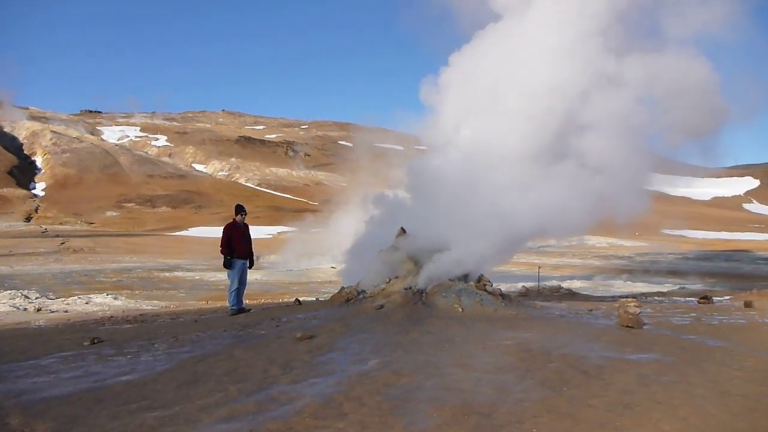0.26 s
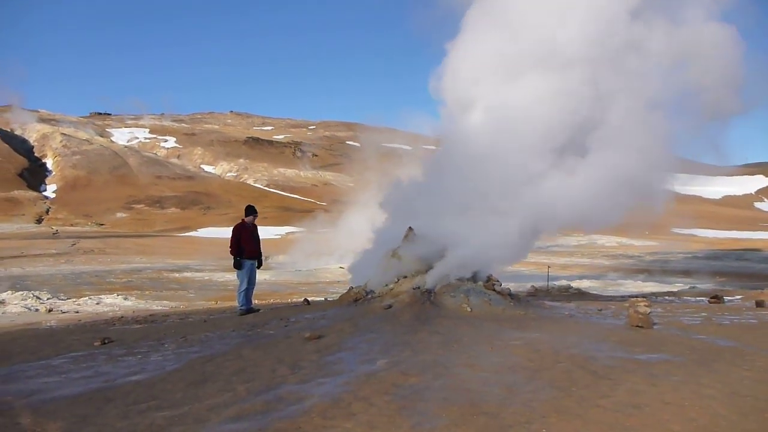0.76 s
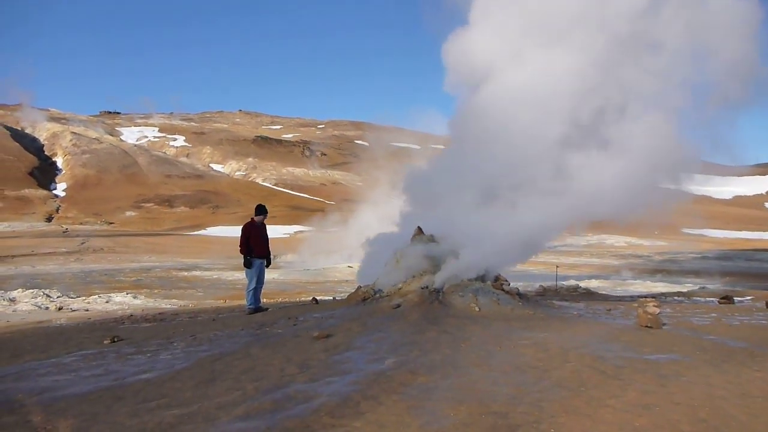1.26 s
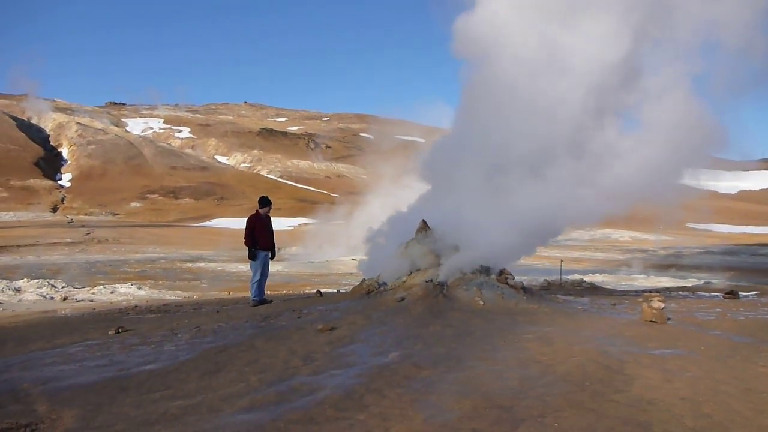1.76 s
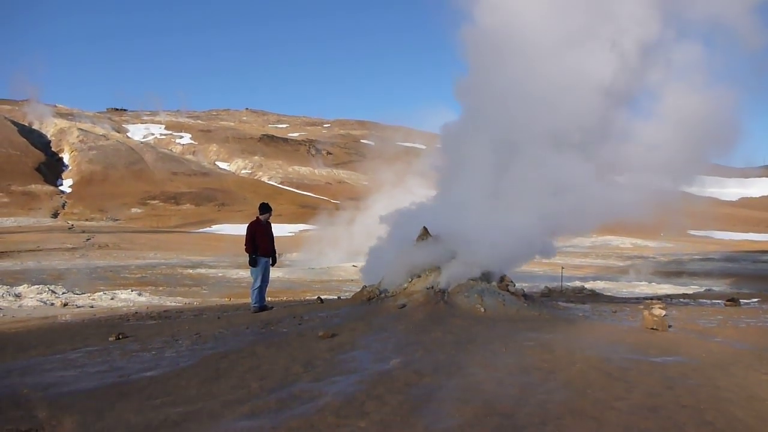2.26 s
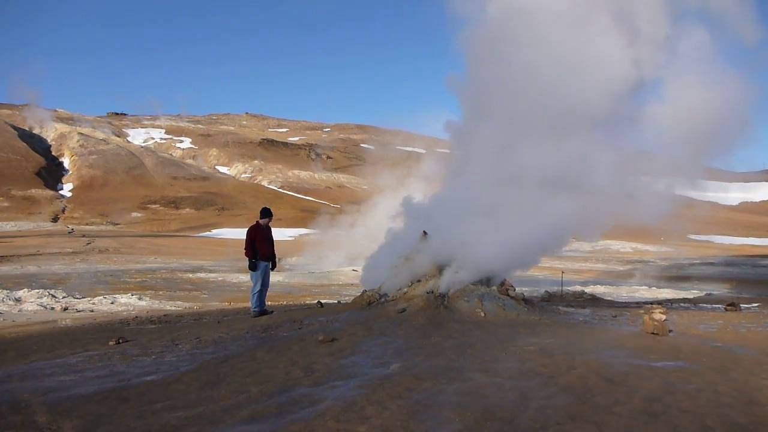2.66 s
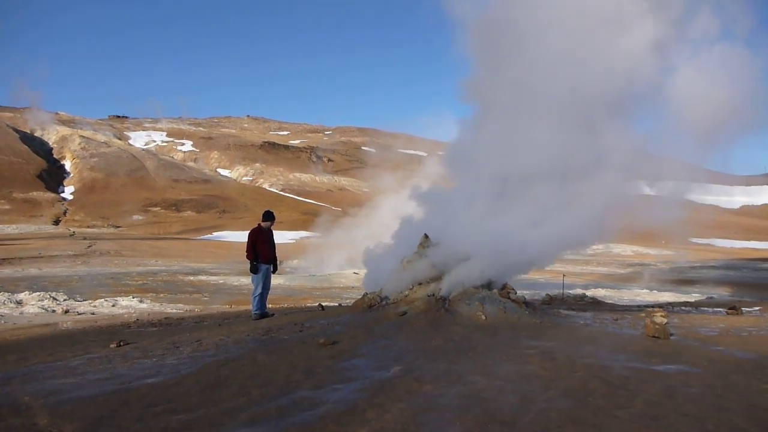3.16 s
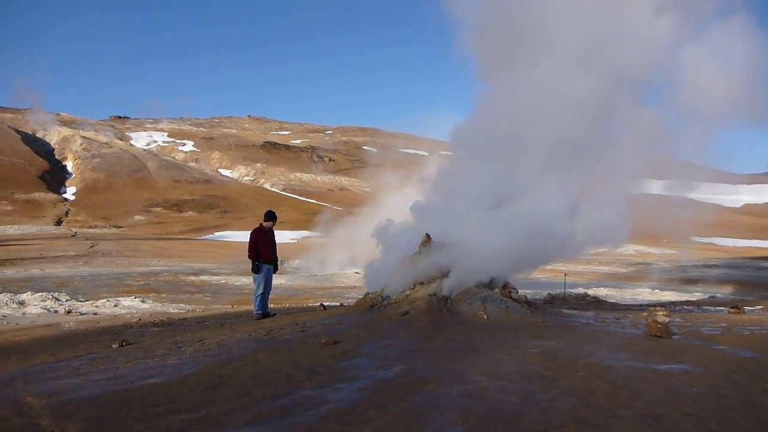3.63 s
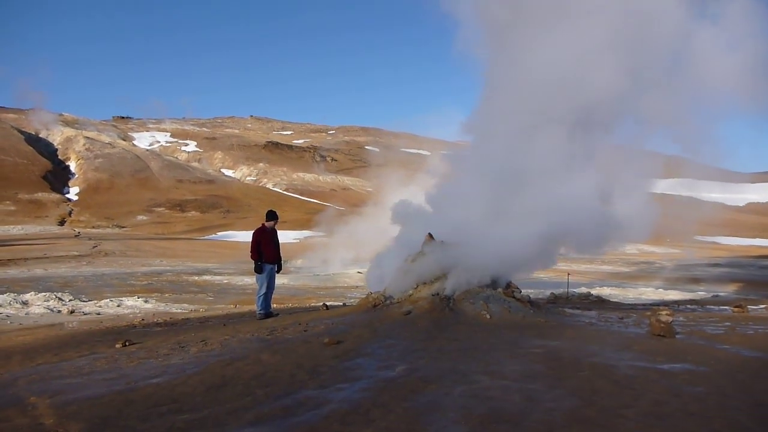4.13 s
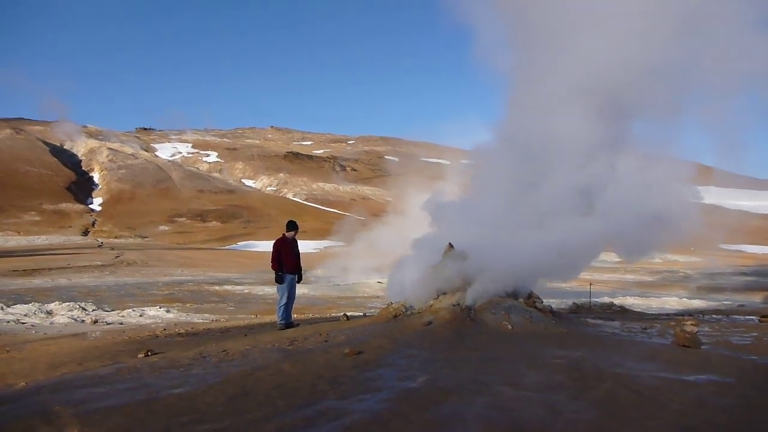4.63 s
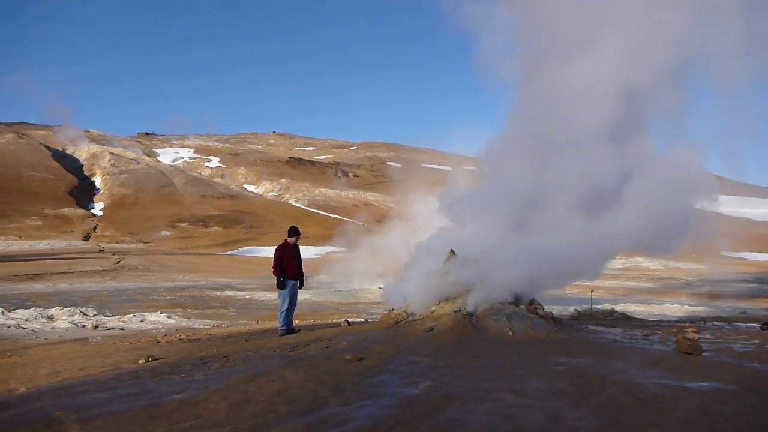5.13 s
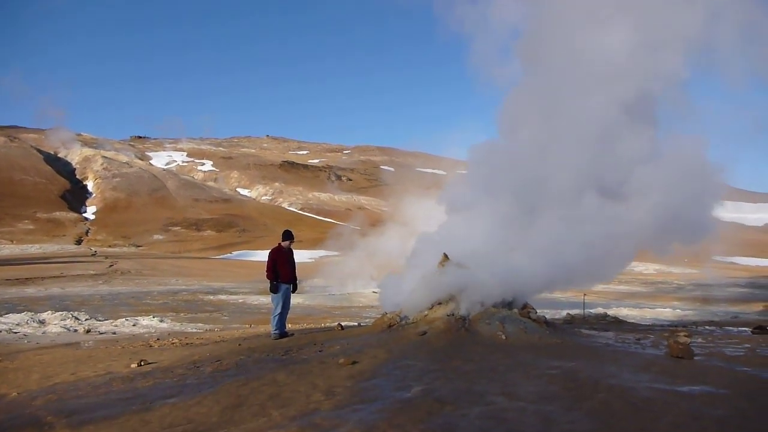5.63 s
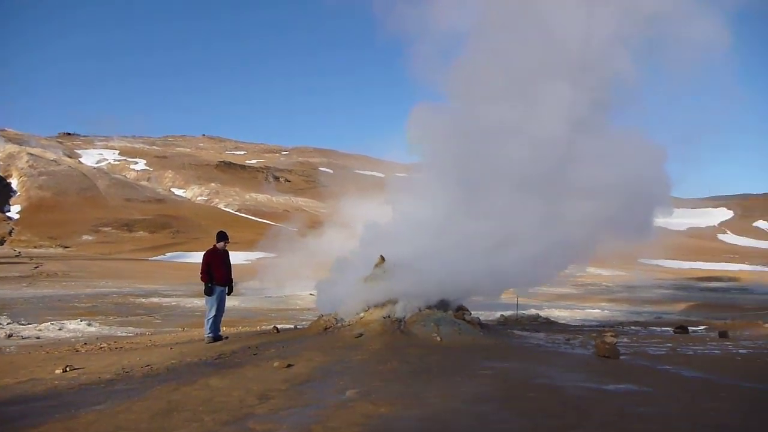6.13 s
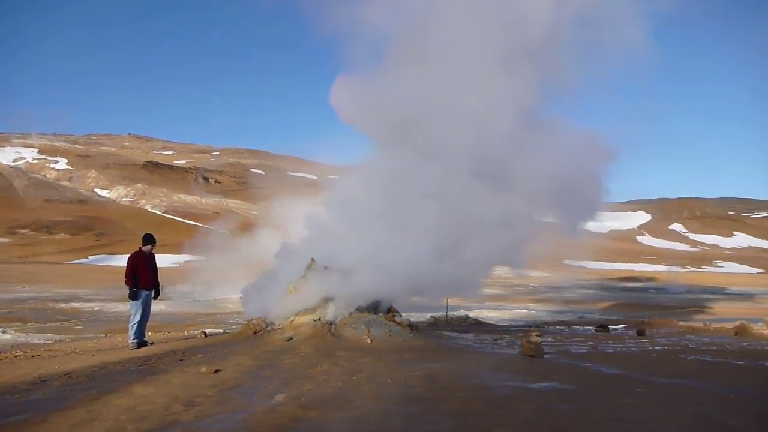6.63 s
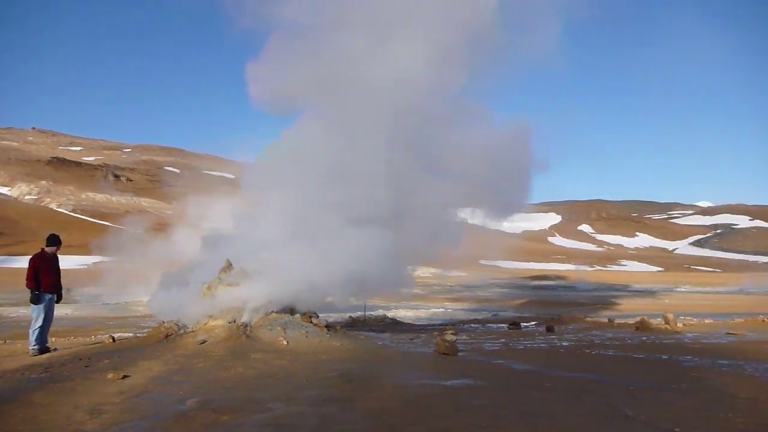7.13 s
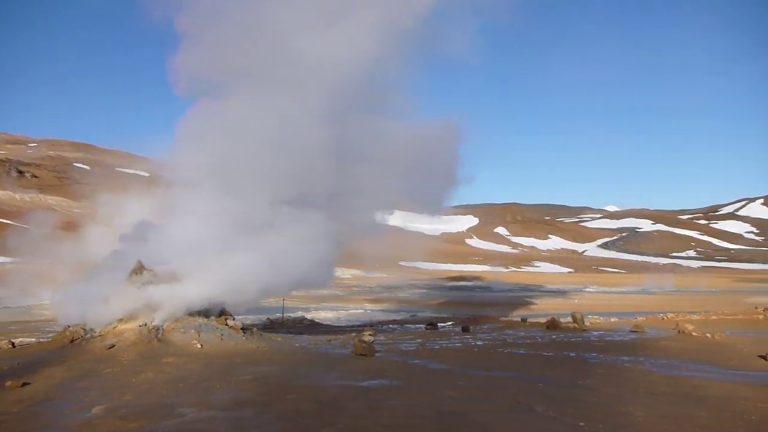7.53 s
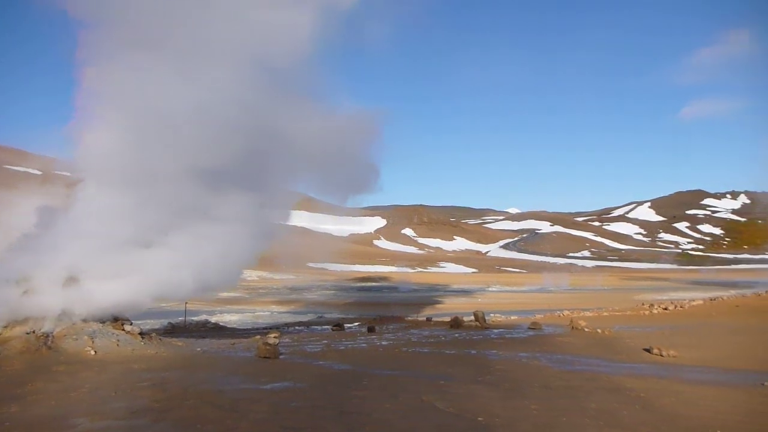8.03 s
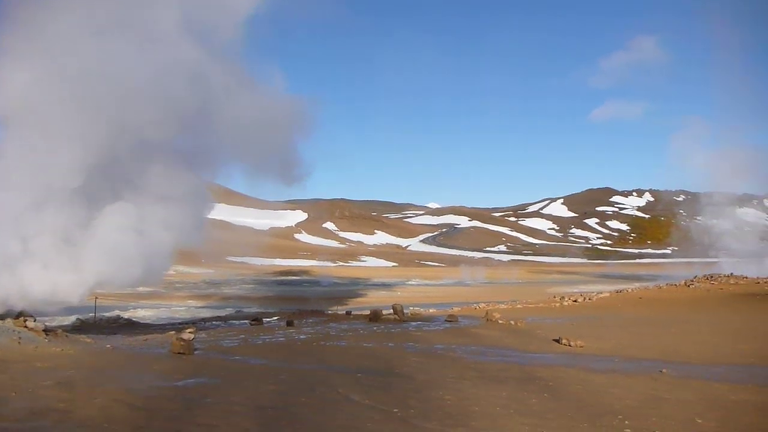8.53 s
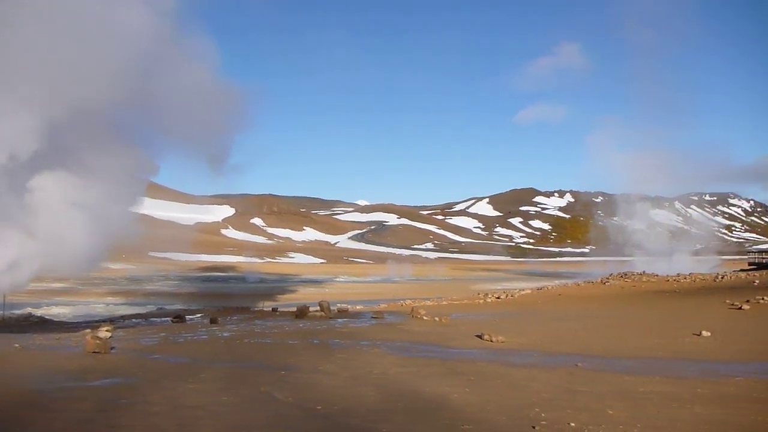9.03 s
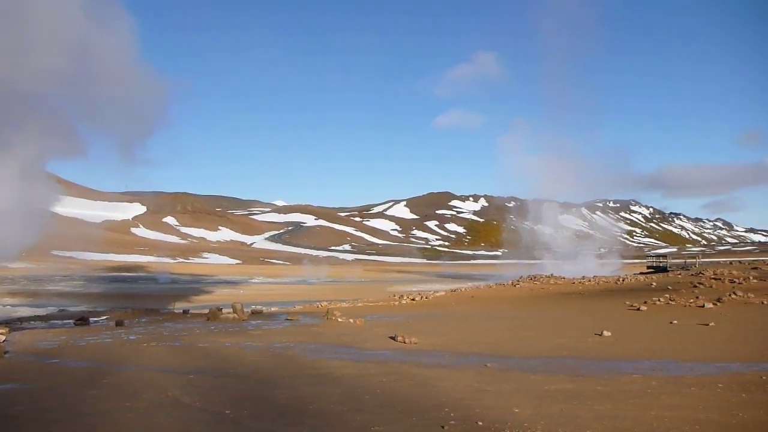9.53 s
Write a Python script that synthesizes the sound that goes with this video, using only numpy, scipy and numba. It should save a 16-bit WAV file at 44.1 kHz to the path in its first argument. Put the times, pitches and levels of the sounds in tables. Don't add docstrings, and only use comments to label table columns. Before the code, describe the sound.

Steady broadband steam roar, full in the low mids with a softer, dulled hiss above, captured in mono by a small camera outdoors. Tiny swells ripple through it. A very brief tone flickers almost at once; past the middle the upper hiss slides in color as the camera pans away, with a single small plastic click. It stops still rushing, barely weaker.

```python
import sys
import numpy as np
from scipy import signal
from scipy.fft import rfft, irfft, next_fast_len
from scipy.io import wavfile
from scipy.ndimage import uniform_filter1d
from numba import njit

SR = 44100
rng = np.random.default_rng(int(sys.argv[2]) if len(sys.argv) > 2 else 0)


def int16_out(signal):
    q = np.round(np.clip(np.atleast_2d(signal).T, -1, 1) * 32767)
    wavfile.write(sys.argv[1], SR, q.astype(np.int16))


def magnitude_from_level(level_db):
    exponent = np.asarray(level_db, float) / 20
    return 10 ** exponent


N = 431298


@njit
def svf(x, hz, width_hz):
    y = np.empty(len(x))
    band, low = 0., 0.
    for i in range(len(x)):
        g = np.tan(np.pi * hz[i] / SR)
        damping = width_hz[i] / hz[i]
        v = (band + g * (x[i] - low)) / (1 + g * (g + damping))
        band = 2 * v - band
        low = low + 2 * g * v
        y[i] = damping * v
    return y


def bell(x, hz, width_hz, db):
    still = np.zeros(len(x))
    return x + (magnitude_from_level(db) - 1) * svf(x, hz + still, width_hz + still)


def columns(table):
    time_s, *rest = np.transpose(table)
    return [np.interp(np.arange(N) / SR, time_s, column) for column in rest]


def walk(rate_hz):
    hold = int(SR / rate_hz)
    steps = np.repeat(rng.standard_normal(N // hold + 1), hold)
    return 1.23 * uniform_filter1d(uniform_filter1d(steps, hold), hold)[:N]


# (time [s], level [dB])
JET_STRENGTH = [
    (0, -24),
    (3, -24),
    (6, -24),
    (8, -24),
    (9.78, -25.5),
]
# (frequency [Hz], density [dB per Hz])
JET_SPECTRUM = [(25, -4), (60, 0.5), (150, 2), (270, 4.5), (600, 1.5), (800, -4), (1400, -6.5), (1900, -11),
                (2400, -14.5), (3200, -19.5), (4300, -24.5), (5000, -31.5), (5900, -39), (7000, -55),
                (9000, -54)]
# (time [s], length [s], frequency [Hz], level [dB])
SURGES = [(1.2, .3, 274.5, 2), (1.05, .15, 780, -1.5), (3.0, .15, 280, 1), (5.0, .15, 260, -2),
          (2.003, 0.18, 560, 2), (2.85, 0.23, 600, 1.5), (3.452, 0.18, 756, 1), (6.299, 0.33, 290, 2),
          (7.0, .25, 330, 0), (7.054, .2, 620, 1), (8.15, .2, 578, 2.5), (9.38, .3, 285, 5)]


def jet():
    surge_width_octaves = 0.32
    t = np.arange(N) / SR
    size = next_fast_len(N)
    octave = np.log2(np.arange(1, size // 2 + 2) * SR / size)
    hz, db = np.transpose(JET_SPECTRUM)
    rush = rfft(rng.standard_normal(size)) * magnitude_from_level(np.interp(octave, np.log2(hz), db))
    out = 0
    for centre in np.arange(5, 14, .5):
        share = np.cos(np.pi * np.clip(octave - centre, -.5, .5)) ** 2
        surge_db = 0
        for at_s, length_s, surge_hz, peak_db in SURGES:
            offset = np.log2(surge_hz) - centre
            if abs(offset) < 1:
                surge_db = surge_db + peak_db * np.exp(
                    -(offset / surge_width_octaves) ** 2 - ((t - at_s) / length_s) ** 2)
        swell_db = 0.41 * walk(2.49) + 0.13 * walk(12) + surge_db
        out = out + irfft(rush * share, size)[:N] * magnitude_from_level(swell_db)
    strength_db = columns(JET_STRENGTH)[0]
    return out / np.std(out) * magnitude_from_level(strength_db + 5)


# (frequency [Hz], width [Hz], level [dB])
GROUND_DIPS = [(406.5, 340, -11.5), (1108, 280, -3.5)]


def ground_echo(x):
    for hz, width_hz, db in GROUND_DIPS:
        x = bell(x, hz * (1 + 0.019 * walk(1.5)), width_hz, db)
    return x


# (time [s], angle [deg])
CAMERA_TURN = [
    (0, 0.5),
    (5.7, -1.5),
    (6.2, 5),
    (6.6, 8.5),
    (7, 14.5),
    (7.5, 20),
    (8.2, 23.5),
    (9.2, 30.5),
    (9.78, 34),
]
# (ahead [Hz], at side [Hz], width [Hz])
DIP_HZ = [(2650, 3870, 1070), (5030, 6250, 870)]
# (ahead [dB], at side [dB], far round [dB])
DIP_DB = [(-4, -13, -4.5), (-13, 0, -10)]
# (frequency [Hz], width [Hz], ahead [dB], at side [dB], far round [dB])
LOBES = [(290, 280, 0.65, 1, 0.5), (1130, 600, 1.35, -1.5, 1), (1900, 620, -0.4, 2.5, -1.2),
         (2280, 370, -1.7, 1.1, 5), (3180, 540, -1.9, 2, 5.5), (5300, 700, 0.5, 0, 4),
         (5630, 300, 0.8, 0, -3.5), (6550, 600, 0.4, 0, 3), (3850, 350, 0.5, 0.5, 1),
         (5950, 300, 0, 2, 0.5), (7450, 700, 0.3, -1.5, -3.5)]
# (frequency [Hz], width [Hz], angle [deg], spread [deg], level [dB])
EDGES = [(2950, 450, 11, 4, 2), (4300, 250, 12, 5, 1.5), (6450, 400, 33, 4, 2), (3430, 260, 13, 4, -3),
         (4020, 380, 19.5, 3, 3), (4950, 500, 20, 2.5, 1.5), (6200, 450, 26, 2.5, -2.5),
         (5600, 300, 33, 4, -2)]


def body_shadow(x):
    side_deg, far_deg = 21, 35
    lower_dip_pinch = 0.22
    angle_deg = columns(CAMERA_TURN)[0]
    climb = np.clip(angle_deg / side_deg, 0, 1)

    def by_angle(ahead, side, far):
        return np.interp(angle_deg, [0, side_deg, far_deg], [ahead, side, far])

    for (ahead_hz, side_hz, width_hz), depth_db, pinch in zip(DIP_HZ, DIP_DB, (lower_dip_pinch, 0)):
        hz = ahead_hz + (side_hz - ahead_hz) * climb
        width_hz = width_hz * (1 - pinch * np.sin(np.pi * climb ** 2))
        for edge in -1, 1:
            x = bell(x, hz + edge * 0.27 * width_hz, width_hz, 0.75 * by_angle(*depth_db))
    for hz, width_hz, *db in LOBES:
        x = bell(x, hz, width_hz, by_angle(*db))
    for hz, width_hz, at_deg, spread_deg, db in EDGES:
        x = bell(x, hz, width_hz, db * np.exp(-((angle_deg - at_deg) / spread_deg) ** 2))
    return x


# (frequency [Hz], width [Hz], level [dB])
PORT_CAVITIES = [(608, 170, 1.5), (1900, 220, 3), (2560, 140, 2), (3525, 220, 3.5), (4200, 300, 1.5),
                 (5600, 350, 1.5), (6960, 350, 3)]


def microphone_port(x):
    for hz, width_hz, db in PORT_CAVITIES:
        x = bell(x, hz, width_hz, db)
    return x


# (time [s], length [s], frequency [Hz], peak level [dB])
WHISTLE = [
    (.227, .011, 975, -23),
]


def whistle():
    t = np.arange(N) / SR
    out = np.zeros(N)
    for at_s, length_s, hz, db in WHISTLE:
        swell = np.exp(-((t - at_s) / length_s) ** 2)
        out += magnitude_from_level(db) * swell * np.sin(2 * np.pi * hz * t)
    return out


# (time [s], peak level [dB])
TICK = [
    (6.7157, -19.5),
]
# (frequency [Hz], level [dB], t60 [s])
SHELL_MODES = [(285, -6, .025), (2340, 6, .009), (2600, 7, .008), (3080, 0, .009), (3900, -11, .011),
               (4400, -12, .009), (6000, -19, .0045)]


def tick():
    out = np.zeros(N)
    t = np.arange(2000) / SR
    contact = (1 - np.exp(-t / .0005)) ** 3
    for at_s, peak_db in TICK:
        ring = sum(magnitude_from_level(db - 60 * t / t60_s) * np.sin(2 * np.pi * hz * t)
                   for hz, db, t60_s in SHELL_MODES)
        at = int(at_s * SR)
        out[at:at + len(t)] -= magnitude_from_level(peak_db + 7) * ring * contact
    return out


def scene():
    rush = microphone_port(body_shadow(ground_echo(jet())))
    return (rush + whistle() + tick())[None]


def top_cut(x):
    return signal.sosfilt(signal.butter(12, 8920, fs=SR, output="sos"), x)


def record(dry):
    lead = 2000
    x = np.concatenate([dry[0, lead:0:-1], dry[0]])
    x = signal.sosfilt(signal.butter(3, 170, "high", fs=SR, output="sos"), x)
    x = bell(x, 2890, 320, -30)
    x = signal.sosfilt(signal.cheby2(8, 24, 7750, fs=SR, output="sos"), x)
    x = bell(x, 8100, 900, -14)
    samples_left = np.arange(len(x))[::-1]
    x = x * (1 - .75 * np.exp(-(samples_left / 70) ** 2))
    return top_cut(x[None, lead:])


dry = scene()
out = record(dry)
int16_out(out)
```